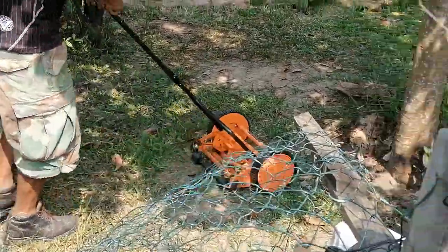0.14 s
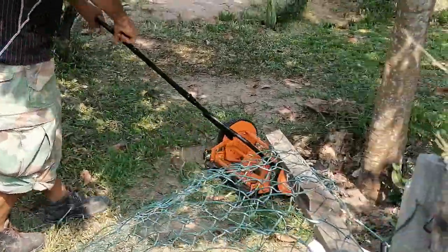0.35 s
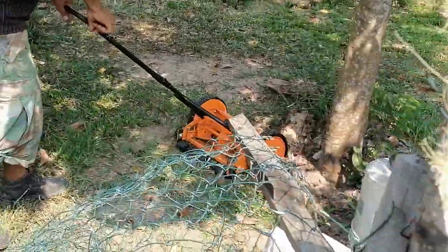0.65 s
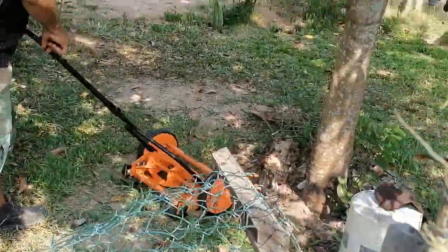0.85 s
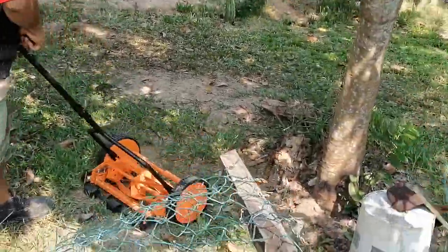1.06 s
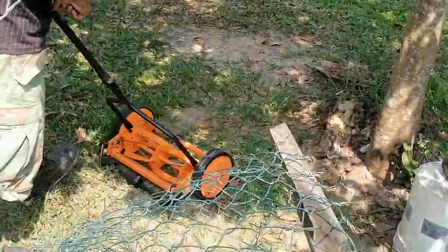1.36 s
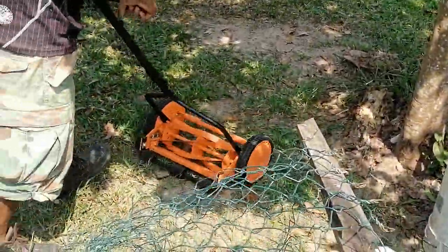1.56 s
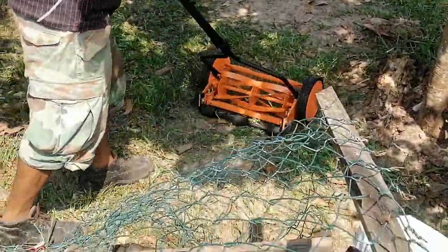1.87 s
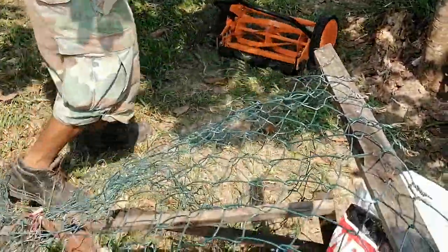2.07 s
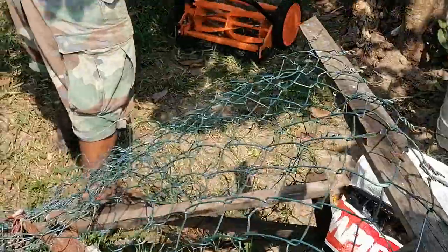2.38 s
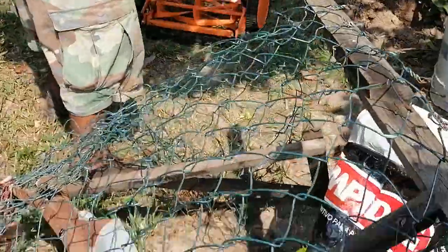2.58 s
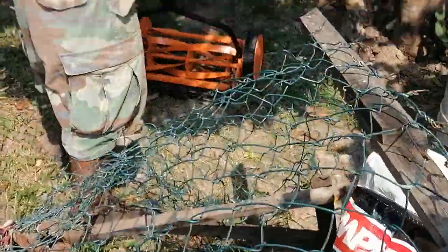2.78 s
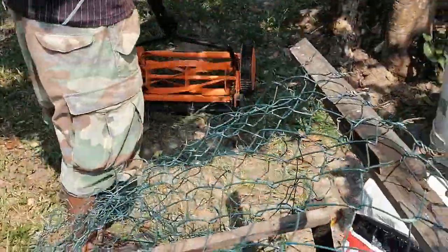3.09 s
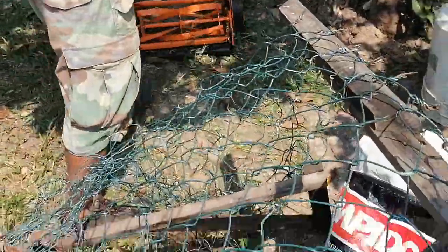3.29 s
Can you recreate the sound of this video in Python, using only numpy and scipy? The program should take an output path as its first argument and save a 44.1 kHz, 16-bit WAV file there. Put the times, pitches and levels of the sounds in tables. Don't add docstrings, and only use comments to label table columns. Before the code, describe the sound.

A hand reel mower scrapes brightly from the start, about twenty raspy blade passes a second, with frame rattle, thinning from 0.9 s and nearly silent by 1.5. At 1.63 s a double metallic clank starts a new whirring stroke, which slows and weakens after 2.4. Low wind thumps come around 3.1-3.2 s as another clank restarts scraping to the end. A low motor hum wavers underneath, in an open yard.

```python
import sys
import numpy as np
from scipy import signal
from scipy.io import wavfile
from scipy.ndimage import uniform_filter1d

SR = 44100
rng = np.random.default_rng(int(sys.argv[2]) if len(sys.argv) > 2 else 0)


def to_wav(s):
    ch = np.atleast_2d(s).T
    pcm = np.round(np.clip(ch, -1, 1) * 32767)
    wavfile.write(sys.argv[1], SR, pcm.astype(np.int16))


def nominal_scale(level):
    x = np.asarray(level, float) / 20
    return 10 ** x


N = 151263

# [t/s, blade scrape level/dB, frame rattle level/dB]
REEL_EFFORT = [(0.0, -32, -36.5), (0.08, -35.5, -42.5), (0.3, -30, -40), (0.55, -36, -44.5),
               (1.18, -43.5, -40), (1.47, -62, -87), (1.61, -58, -58.5), (1.63, -39.5, -34),
               (1.64, -42, -34.5), (1.8, -28.5, -37), (1.87, -33, -41.5), (2.76, -44, -42.5),
               (3.09, -68.5, -62), (3.14, -42, -43), (3.22, -46, -54.5), (3.24, -37, -38.5),
               (3.42, -36.5, -42.5), (3.43, -28.5, -38)]
# [t/s, peak level/dB, hush before it/s]
FIRST_PASSES = [(0.0129, -38, 0.0058), (0.1017, -17, 0.013), (0.149, -18.5, 0.019), (0.186, -25, 0.0072),
                (0.2394, -22, 0.0066), (0.3167, -22, 0.0063), (0.3666, -20, 0.012), (0.4015, -19.5, 0.015),
                (0.446, -17.5, 0.0062), (0.4983, -16.5, 0.0089), (0.5394, -25, 0.037),
                (0.592, -19.5, 0.0071), (0.637, -22.5, 0.026), (0.702, -25, 0.031), (0.7577, -16.5, 0.014),
                (0.8145, -24, 0.031), (0.8395, -25, 0.014), (0.8994, -35, 0.016), (0.948, -30, 0.026),
                (0.9722, -23, 0.016), (1.112, -30.5, 0.0069), (1.1707, -32, 0.033)]
LATER_PASSES = [(1.6265, -30, 0.015), (1.674, -25, 0.01), (1.73, -23, 0.0064), (1.771, -22, 0.0083),
                (1.817, -27, 0.045), (1.9335, -21, 0.022), (1.9737, -20.5, 0.0074), (2.008, -20.5, 0.0079),
                (2.1041, -23, 0.0072), (2.165, -27, 0.0054), (2.2726, -35, 0.051), (2.3117, -29.5, 0.018),
                (2.379, -31, 0.013), (2.4608, -23, 0.011), (2.552, -24, 0.0098), (2.5816, -48, 0.024),
                (2.61, -29, 0.03), (2.6718, -55, 0.015), (2.741, -31, 0.034), (2.8125, -60, 0.01),
                (2.8473, -34, 0.0064), (2.9018, -43, 0.015), (3.1306, -32.5, 0.021), (3.2283, -26, 0.011),
                (3.2744, -27, 0.0075), (3.3114, -23.5, 0.0064), (3.3554, -29, 0.0058), (3.405, -35, 0.017)]
# [f/Hz, width/Hz, level/dB]
BLADE_MODES = [(4080, 640, 3), (5006, 250, 2), (5340, 41, -2), (5490, 210, 3), (6010, 160, 0.5),
               (6420, 260, 0), (6880, 190, 1), (7175, 130, 0.5)]
# [f/Hz, width/Hz, level/dB]
FRAME_MODES = [(1069.5, 32, -1), (1390, 120, -11.5), (1700, 200, 2), (1957, 310, -0.5), (2360, 260, 1.5),
               (3057, 190, 2), (3263, 72, -4.5), (3328, 75, -3)]
# [t/s, level/dB, f/Hz]
FRAME_PINGS = [(0.271, -47, 1990), (0.282, -40, 3130), (0.411, -52, 3040), (0.439, -50, 2980),
               (0.446, -45.5, 2373), (0.539, -44.5, 1610.0), (0.601, -46.5, 2016), (0.753, -53, 2990.0),
               (0.832, -42, 3090), (0.903, -45.2, 2020), (1.199, -38, 1058), (1.731, -44.5, 1795),
               (1.783, -38.5, 2870), (1.832, -39, 1890.0), (1.955, -41, 3360.0), (1.977, -44, 2370),
               (2.008, -42.7, 1038), (2.017, -38.5, 3360.0), (2.107, -39.5, 3410), (2.355, -38.5, 3300),
               (2.398, -44, 3300), (2.554, -46.5, 3220), (2.609, -44.5, 2350.0), (2.611, -43, 3250),
               (2.74, -44, 3170.0), (2.776, -50, 2520.0), (2.83, -44, 1620), (3.239, -41, 3167),
               (3.274, -36, 3410), (3.28, -41, 1700.0), (3.357, -39, 3230.0)]
# [t/s, level/dB, f/Hz]
BLADE_PINGS = [(0.011, -32.5, 5510.0), (0.157, -29, 5470.0), (0.183, -34, 6140.0), (0.187, -33.5, 4460.0),
               (0.192, -29, 6930.0), (0.29, -31, 5040.0), (0.365, -30.5, 7080.0), (0.368, -37, 5430.0),
               (0.443, -32, 7170.0), (0.45, -36, 6030.0), (0.5, -35.2, 7210.0), (0.588, -39, 7320.0),
               (0.592, -35.5, 6500.0), (0.66, -31.5, 6010.0), (0.77, -33, 5060.0), (0.782, -39, 4010.0),
               (0.899, -36.5, 4970.0), (0.9, -47.5, 5320.0), (1.77, -37.7, 7260.0), (1.786, -42, 5340.0),
               (1.827, -35.6, 7210.0), (1.845, -38, 6290.0), (2.105, -40, 5280.0), (2.272, -35.5, 6960.0),
               (2.32, -42.5, 4130.0), (2.388, -40, 6980.0), (2.55, -40, 7060.0), (2.627, -41, 4010.0),
               (2.758, -51, 7060.0), (2.845, -47, 5040.0), (3.285, -39, 4630.0), (3.286, -37, 4930.0),
               (3.289, -41, 5900.0), (3.357, -38.6, 4630.0)]
# [t/s, level/dB, crack level/dB]
PAWL_CLANKS = [
    (1.628, -28, 2),
    (1.649, -33, 0),
    (3.131, -31, -9),
    (3.146, -39, -6),
]
# [f/Hz, level/dB, time to fall 60 dB/s]
CLANK_MODES = [(650, -7, .05), (830, -6, .05), (1071, 0, .065), (1180, -7, .04), (1350, -10, .03),
               (1665, -3, .06), (1900, -9, .04), (3365, -18, .035)]
# [t/s, level/dB]
GRIT_TICKS = [
    (0.3205, -24),
    (1.3314, -30),
    (1.852, -25),
    (2.274, -32),
    (3.2045, -36),
    (3.3125, -26),
]
# [multiple of the firing rate, level/dB]
MOTOR_ORDERS = [(1, -11.5), (2, -11.5), (3, -18), (4, -1), (5, -13.5), (6, -2.5), (7, 3), (8, -2.5),
                (9, -8), (10, -14.5), (11, -26.5), (14, -24), (15, -17), (16, -18), (17, -33)]
# [t/s, hum level/dB, fourth multiple level/dB, exhaust hiss against hum/dB]
MOTOR_HEARD = [(0.0, -38.5, -48, -4.5), (0.04, -36.5, -51.5, -21), (0.37, -43.5, -48, -20.5),
               (0.99, -39, -44, -9), (1.34, -39.5, -41, -9.5), (1.59, -34.5, -41.5, -13),
               (1.94, -54.5, -54, -12), (1.98, -55.5, -50, 5.5), (2.35, -43.5, -52.5, -16.5),
               (2.82, -37.5, -48.5, -14), (3.05, -38.5, -50.5, -17.5), (3.09, -43.5, -45, -21),
               (3.19, -46, -54, -16), (3.21, -42.5, -50, -26), (3.36, -46.5, -55, -18),
               (3.43, -49, -52, -16)]
# [t/s, tilt/dB per multiple above the seventh]
EXHAUST_TILT = [(0, -1), (.4, -0.35), (.9, 0.5), (1.4, 1.3), (1.8, -1), (2.3, 1.5), (2.6, -1.6), (2.8, -.3),
                (3.05, -0.7), (3.43, -0.3)]
# [t/s, level/dB]
WIND_GUST = [(2.85, -48), (3.002, -45.5), (3.05, -38.5), (3.196, -34.5), (3.21, -45.5), (3.358, -45.5),
             (3.39, -62), (3.414, -50), (3.43, -62)]
# [t/s, level/dB, f/Hz]
WIND_THUMPS = [
    (3.083, -20, 110),
    (3.149, -20, 179),
    (3.183, -17, 133),
]
# [f/Hz, level/dB per Hz]
YARD_COLOUR = [(25, -6), (60, 7), (150, 3), (400, -5), (1100, -11), (1850, -9.5), (2700, -27),
               (4100, -41.5), (5300, -26.5), (7500, -37)]
# [t/s, share cancelled]
GROUND_DIP = [(0, 0.63), (1.3, 0.59), (1.9, 0.37), (2.4, 0.065), (3.43, .1)]

MOTOR_HZ = 48.21
YARD_DB = -48
RATTLE_DB = -12
PASS_ATTACK_S, PASS_HOLD_S, PASS_RELEASE_S = 0.011, 0.019, 0.007


def unit(x):
    return x / np.sqrt(np.mean(x ** 2))


def curve(table, axis=1):
    points = np.array(table)
    return np.interp(np.arange(N) / SR, points[:, 0], points[:, axis])


def ring(x, hz, width_hz):
    return signal.lfilter(*signal.iirpeak(hz, hz / width_hz, fs=SR), x)


def ring_twice(x, hz, width_hz):
    return ring(ring(x, hz, width_hz), hz, width_hz)


def walk(rate):
    hold = int(SR / rate)
    steps = np.repeat(rng.standard_normal(N // hold + 1), hold)
    return 1.79 * uniform_filter1d(uniform_filter1d(steps, hold), hold)[:N]


def reel():
    pass_power, hush = passes()
    scrape = nominal_scale(curve(REEL_EFFORT) - 4.0 + 2.06 * walk(130)) * hush
    rattle = nominal_scale(curve(REEL_EFFORT, axis=2) - 6.5 + 1.7 * walk(40.5)) * hush ** 1.2
    scrape = np.sqrt(scrape ** 2 + nominal_scale(-36.0) * pass_power)
    rattle = np.sqrt(rattle ** 2 + nominal_scale(-32.5 + 2 * RATTLE_DB) * pass_power)
    shear = unit(ring_twice(grit(6000, spread_db=5.5), 5450, 3400)) * scrape
    grass = unit(ring_twice(grit(4000, spread_db=3.5), 2200, 3800)) * rattle
    blades = steel(scrape, BLADE_MODES, hits=1500, spread_db=3.0, flicker_db=1.0, rate=90)
    frame = steel(rattle, FRAME_MODES, hits=700, spread_db=3.3, flicker_db=2, rate=70)
    blades = blades + nominal_scale(-4) * shear
    burrs = pings(FRAME_PINGS, gain_db=0.9) + pings(BLADE_PINGS, gain_db=0.8)
    return blades * nominal_scale(0.5) + frame + nominal_scale(-10) * grass + burrs


def passes():
    t, power, hush = np.arange(N) / SR, np.zeros(N), np.zeros(N)
    for s, db, gap in list(FIRST_PASSES) + list(LATER_PASSES):
        since = t - s
        rise = np.clip(since / PASS_ATTACK_S + 0.5, 0, 1)
        fall = np.exp(-2 * np.clip(since - PASS_HOLD_S, 0, None) / PASS_RELEASE_S)
        power += nominal_scale(2 * db) * rise * fall
        quiet = np.clip(2 + 2 * since / max(gap, 0.002), 0, 1) * (since < 0)
        hush = np.maximum(hush, quiet)
    return power, nominal_scale(-5 * hush)


def grit(rate, spread_db):
    chance, side, size = rng.random((3, N))
    knocks = (chance < rate / SR) * np.sign(side - 0.5)
    return unit(knocks * nominal_scale(-spread_db * np.log(1 - 0.97 * size)))


def steel(strength, modes, hits, spread_db, flicker_db, rate):
    norm = np.sqrt(sum(nominal_scale(2 * db) for hz, width, db in modes) * np.pi / SR)
    out = 0
    for hz, width, db in modes:
        knocks = strength * grit(hits, spread_db) * nominal_scale(flicker_db * walk(rate))
        out = out + nominal_scale(db) / np.sqrt(width) * ring(knocks, hz, width)
    return out / norm


def pings(table, gain_db):
    t, out = np.arange(int(0.06 * SR)) / SR, np.zeros(N + SR)
    rise_s = 0.005
    swell = t / rise_s * np.exp(1 - t / rise_s)
    for s, db, hz in table:
        i = int(s * SR)
        rough = unit(ring(rng.standard_normal(len(t)), hz, 150))
        out[i:i + len(t)] += nominal_scale(db + gain_db) * swell * (np.sin(2 * np.pi * hz * t) + 0.6 * rough)
    return out[:N]


def clanks():
    t, out = np.arange(int(0.2 * SR)) / SR, np.zeros(N + SR)
    for s, db, crack_db in PAWL_CLANKS:
        i, hit = int(s * SR), 0
        for (hz, level, t60), k in zip(CLANK_MODES, rng.random(len(CLANK_MODES)) - 0.5):
            tone = np.sin(2 * np.pi * hz * (1 + k / 100) * t)
            hit = hit + nominal_scale(level + 4 * k) * tone * np.exp(-np.log(1000) * t / t60)
        crack = ring(rng.standard_normal(len(t)), 1300, 1800) * np.exp(-t / 0.007) * nominal_scale(crack_db)
        out[i:i + len(t)] += nominal_scale(db) * (hit + crack) * np.clip(t / 0.00043, 0, 1)
    for s, db in GRIT_TICKS:
        i = int(s * SR)
        tick = ring_twice(rng.standard_normal(len(t)), 6000, 4000)
        out[i:i + len(t)] += nominal_scale(db + 3) * tick * np.exp(-t / 0.002)
    return out[:N]


def motor():
    phase = 2 * np.pi * (np.cumsum(MOTOR_HZ * (1 + 0.00041 * walk(3.15))) / SR + 0.6)
    body = 0
    for k, db in MOTOR_ORDERS:
        if k == 4:
            boom = np.sqrt(2) * np.cos(k * phase + 0.082 * walk(12))
            boom = boom * nominal_scale(1.6 * walk(12)) * nominal_scale(curve(MOTOR_HEARD, axis=2))
            continue
        tilt = np.clip(k - 7, -3, 3) * curve(EXHAUST_TILT)
        waver = min(abs(k - 7) + 0.89, 2.2) * walk(7)
        lag = 1.9 * np.arctan((k * MOTOR_HZ - 345) / 60)
        body = body + nominal_scale(db + tilt + waver) * np.cos(k * phase - lag + 0.2 * walk(8))
    puff = unit(ring_twice(rng.standard_normal(N), 320, 180))
    gas = ring_twice(rng.standard_normal(N), 870, 700)
    gas = unit(gas * nominal_scale(2.2 * np.cos(phase - 1.2)))
    hum = unit(body) + nominal_scale(curve(MOTOR_HEARD, axis=3)) * gas + nominal_scale(-12.0) * puff
    return hum * nominal_scale(curve(MOTOR_HEARD) + 0.04) + boom


def wind():
    t = np.arange(N) / SR
    air = rng.standard_normal(N) * nominal_scale(1.3 * walk(29.53))
    low = unit(ring_twice(air, 99, 140))
    low = low + nominal_scale(-7) * unit(ring(ring_twice(air, 210, 180), 190, 180))
    low = low + nominal_scale(-9.0) * unit(ring_twice(air, 51, 70))
    out = low * nominal_scale(curve(WIND_GUST) + 3.0) * np.clip((t - 2.85) / 0.068, 0, 1)
    for s, db, hz in WIND_THUMPS:
        cycles = np.clip(t - s, 0, None) * hz
        out = out - nominal_scale(db) * 3 * cycles * np.exp(-cycles / 0.45) * np.sin(2 * np.pi * cycles)
    return out


def yard():
    colour, out = np.array(YARD_COLOUR), 0
    for hz in 30 * 2 ** np.arange(0, 8.1, 1 / 3):
        db = np.interp(np.log(hz), np.log(colour[:, 0]), colour[:, 1]) + 1.6 * walk(9)
        out = out + nominal_scale(db) * ring_twice(rng.standard_normal(N), hz, hz / 3)
    return unit(out) * nominal_scale(YARD_DB)


def scene():
    mono = reel() + clanks() + motor() + yard() + wind()
    mono = mono - np.clip(curve(GROUND_DIP), 0, 0.9) * ring(mono, 3900, 650)
    return np.array([mono, mono])


def band_limit(x):
    return signal.sosfilt(signal.butter(12, 8520, fs=SR, output="sos"), x)


def record(dry):
    top_cut = signal.ellip(10, 0.5, 75, 7562, fs=SR, output="sos")
    mix = signal.sosfilt(top_cut, dry)
    return band_limit(mix)


dry = scene()
out = record(dry)
to_wav(out)
```